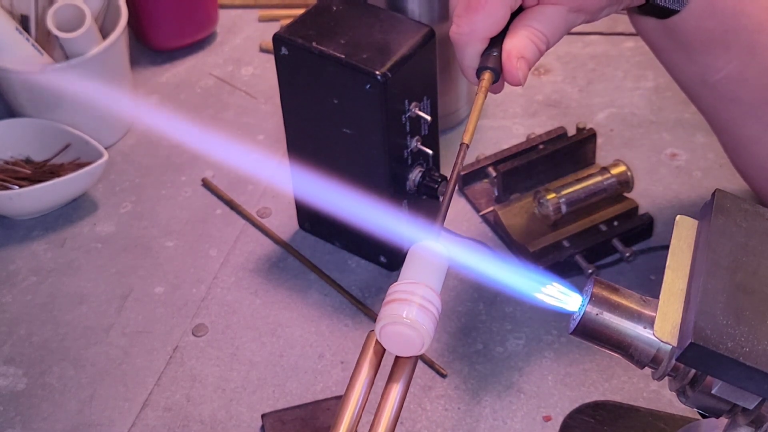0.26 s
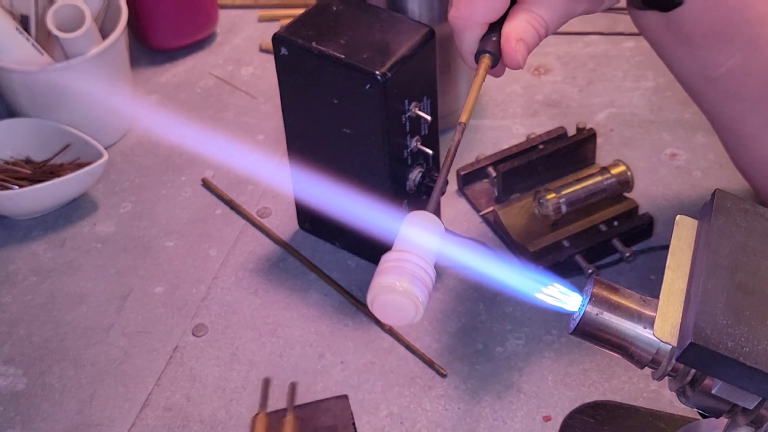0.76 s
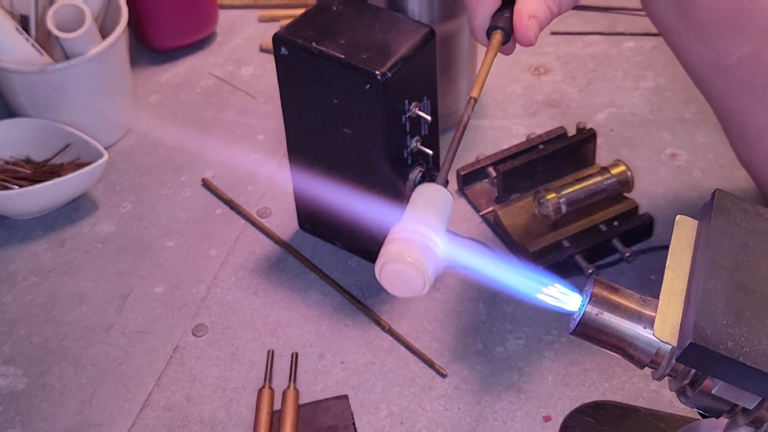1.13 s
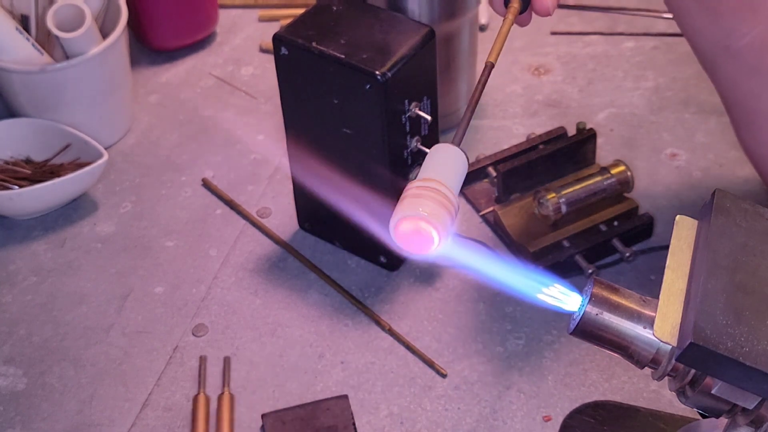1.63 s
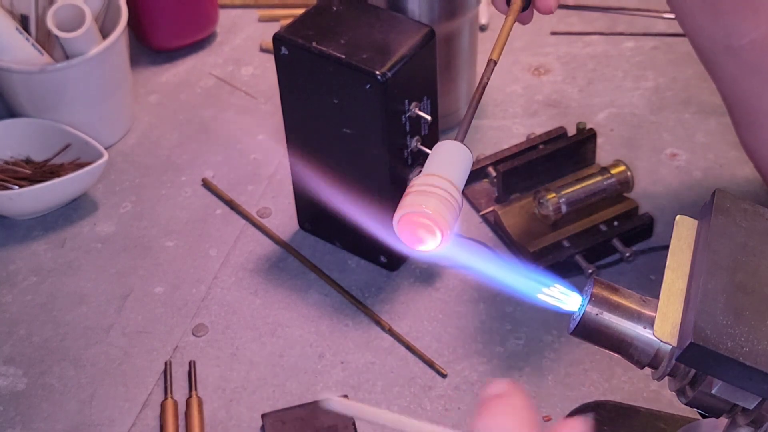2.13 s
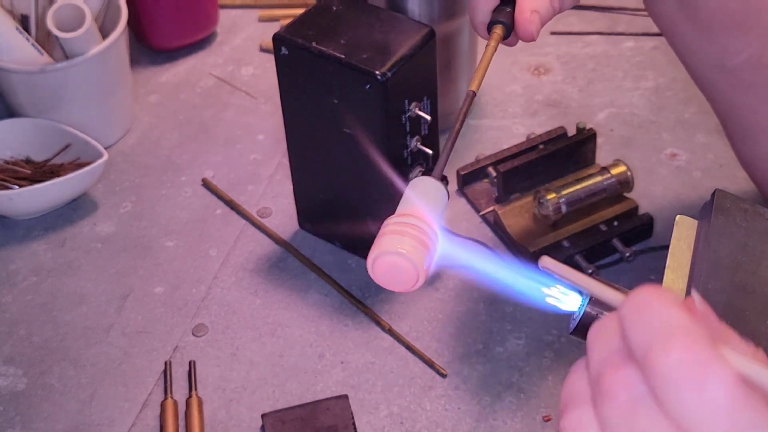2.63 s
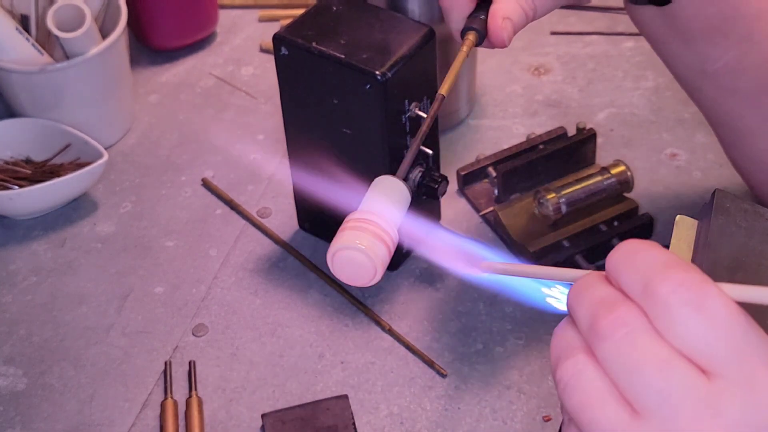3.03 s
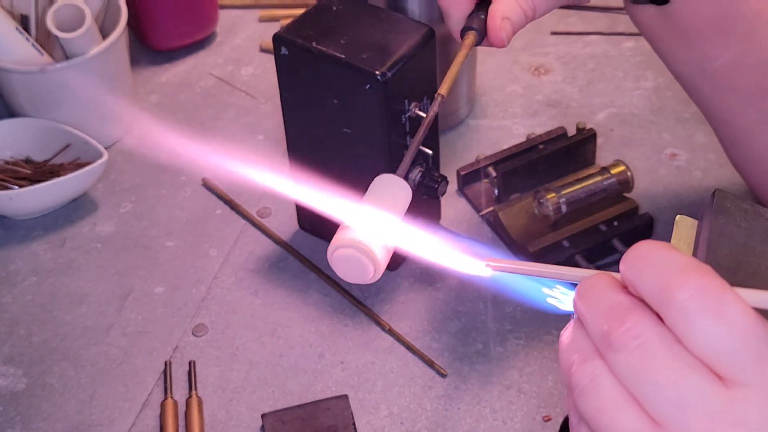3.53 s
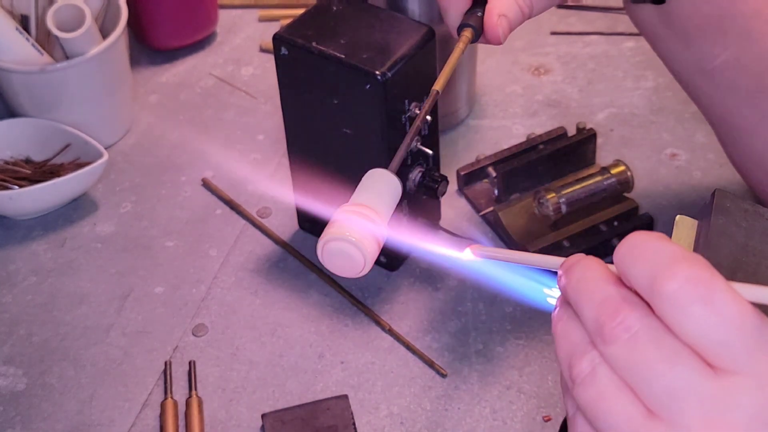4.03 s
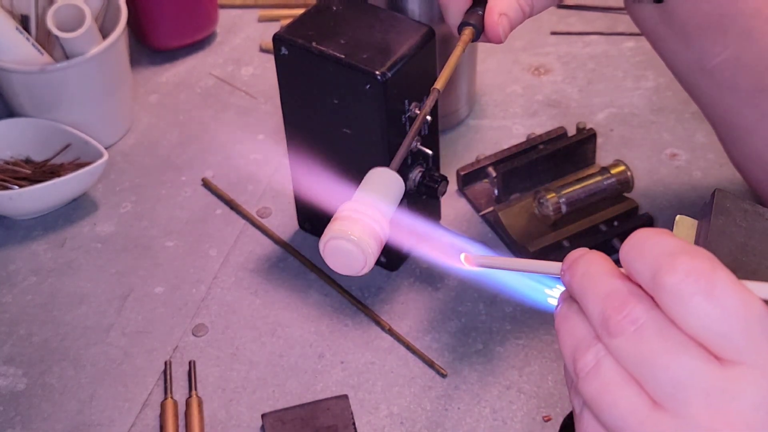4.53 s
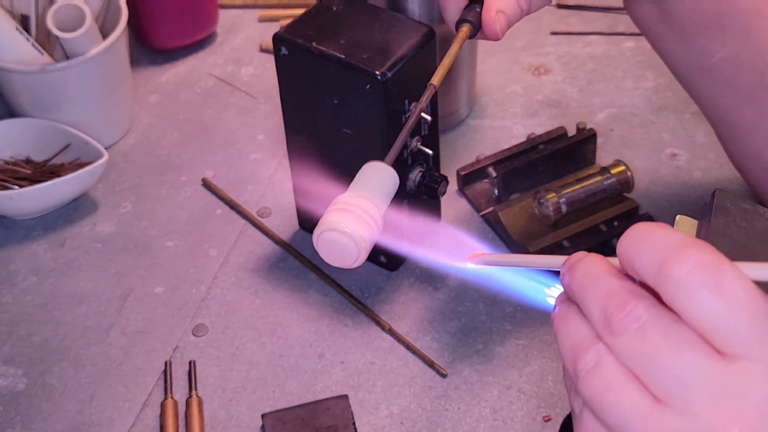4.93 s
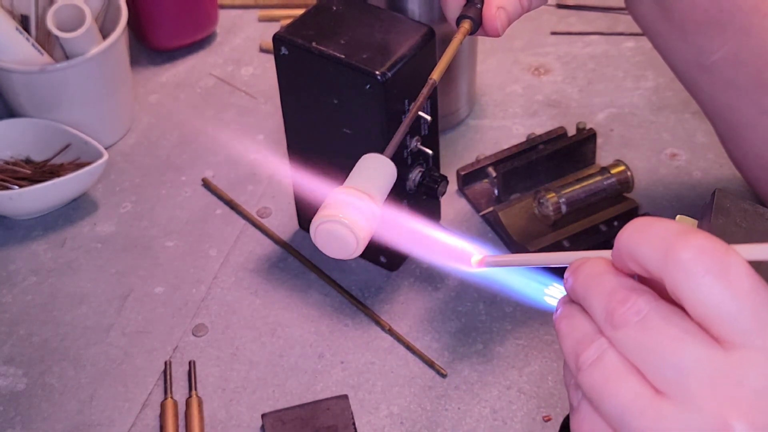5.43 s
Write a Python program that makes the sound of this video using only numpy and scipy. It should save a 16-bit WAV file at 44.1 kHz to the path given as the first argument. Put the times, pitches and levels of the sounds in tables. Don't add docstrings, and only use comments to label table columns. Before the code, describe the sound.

A low motor hum drones steadily under a soft breathy torch hiss while a metal tool scrapes and knocks on a bench early on.

```python
import sys
import numpy as np
from scipy import signal
from scipy.fft import rfft, irfft, next_fast_len
from scipy.io import wavfile
from scipy.ndimage import uniform_filter1d

SR = 44100
rng = np.random.default_rng(int(sys.argv[2]) if len(sys.argv) > 2 else 0)


def log_audio(samples):
    frames = np.atleast_2d(samples).T
    limited = np.clip(frames, -1, 1)
    pcm = np.round(limited * 32767).astype(np.int16)
    wavfile.write(sys.argv[1], SR, pcm)


def level_to_linear(level):
    exponent = np.asarray(level, float) / 20
    return 10 ** exponent


N = 250782

# time in seconds, turns per second, load released from 0 to 1.
MOTOR_SPEED = [
    (0, 28.888, 0),
    (4.7, 28.647, 0),
    (4.715, 28.715, 1),
    (4.78, 29.007, 1),
    (5.7, 29.007, 1),
]
CRANK_START_RAD, CASING_LAG_RAD = 3.965, 2.0
RELEASED_LAG_RAD = .6
CASING_GROWTH_DB_PER_S = 0.56
# multiple of the speed, loaded level in dB, released level in dB, left-right in dB.
MOTOR_TONES = [(1, -65, -62, 8), (2, -36, -36, 3.5), (3, -57, -51.5, -3), (4, -45, -44.5, 9.5),
               (5, -55.5, -60, 1), (6, -56, -54.5, -1), (7, -54.5, -52, 1), (8, -128, -73, 5),
               (9, -73.5, -69, 10), (10, -55.5, -61.5, -1.5), (11, -51, -55, 1.5), (12, -59, -62, -2.5),
               (13, -71, -69, 2), (14, -80, -73, 10), (17, -75, -83, 10)]

# time in seconds, level in dB, pitch in Hz, time to fall 60 dB in seconds.
VALVE_PINGS = [
    (4.712, -56, 2150, .04),
    (4.742, -46, 2180, .05),
    (4.775, -50, 1400, .05),
    (4.676, -53, 385, .25),
    (4.703, -52, 395, .1),
    (4.74, -51, 410, .16),
    (4.725, -53, 740, .06),
    (4.73, -56, 5300, .02),
]
# pitch in Hz, level in dB per Hz.
PUFF_COLOUR = [(300, -11), (520, -2), (740, -6), (1030, -13), (2120, -15), (4000, -17), (5400, -10),
               (6800, -15), (8500, -11), (11000, -19), (17500, -21)]
# pitch in Hz, width in Hz, level in dB.
PUFF_PEAKS = [(2220, 88, -10), (5150, 620, -10), (8070, 250, -17), (9600, 200, -20)]
PUFF_S, PUFF_DB, PUFF_RISE_DB_PER_S, PUFF_FALL_DB_PER_S = 4.733, -47, 181, 262

# time in seconds, bead in the core from 0 to 1, rod in the jet from 0 to 1.
WORK_IN_JET = [(0, 0.46, 0.2), (.45, 0, 0.5), (.9, 0.6, 0.23), (1.3, 0.27, 0.6), (1.9, 0.97, 0.25),
               (2.4, 1, 0.12), (2.9, 0.66, 0.42), (3.2, 0.7, 0.58), (3.7, 0.26, 0.78), (4.4, 0.47, 0.74),
               (4.85, 0.22, 1), (5.1, 0.33, 0.67), (5.4, 0, 0.7), (5.69, 0.3, 0.9)]
# pitch in Hz, level in dB per Hz.
HISS_COLOUR = [(330, -21), (560, -8), (750, -2.5), (1170, 1), (1600, -4.5), (2300, -4), (2900, -1),
               (3850, -6), (6500, -7.5), (9160, -9), (11100, -18), (13000, -13), (15200, -15), (17500, -8)]
# pitch in Hz, width in Hz, level in dB under the hiss.
FLAME_PEAKS = [(498.2, 26, -12), (931, 70, -22), (1195, 250, -18.5), (1407, 80, -17), (1907, 240, -18.5),
               (4835, 140, -17.5), (6010, 98, -18), (6510, 290, -17.5), (7750, 310, -23.5),
               (10320, 250, -25), (12800, 550, -18)]
# pitch in Hz, width in Hz, level in dB.
NOZZLE_WHISTLES = [
    (2658, 170, -2.5),
    (2907, 520, -5),
    (2876, 36, -15.5),
    (3315, 240, -11.5),
    (9024, 630, -1.5),
    (12970, 400, -3),
]
HISS_DB, HISS_ROD_DB = -58.5, 0.32
LOW_DB, LOW_BEAD_DB = -59.5, -9
MAIN_DB, MAIN_ROD_DB = -66, 13.5
HIGH_DB, HIGH_BOTH_DB = -71, 30
OVERTONE_HZ, OVERTONE_WIDTH_HZ, OVERTONE_DB, OVERTONE_BEAD_DB = 5880, 120, -87.5, 16
PEAK_WANDER_DB, FLUTTER_DB = 1.0, 1.2
# pitch in Hz, width in Hz, share lost from 0 to 1.
REFLECTION_DIPS = [(2240, 97, 0.23), (2765, 58, 0.25), (3860, 290, 0.18), (5410, 160, 0.23),
                   (7730, 270, 0.13)]
# time in seconds, level in dB, pitch in Hz.
SINGING_WHISTLE = [(0, -10, 3000), (1.0, 1, 3000), (1.75, 0, 3020), (2.0, 9.5, 3050), (2.4, 10, 3050),
                   (2.7, -4, 3030), (3.2, 2, 3030), (3.8, 1, 3010), (4.4, 1, 3060), (4.9, -5, 3040),
                   (5.3, 4, 3070), (5.58, 9.5, 3070), (5.69, -2, 3080)]
SINGING_DB, SINGING_WIDTH_HZ = -8.5, 68
# start in seconds, rise in seconds, pitch in Hz, width in Hz, dB.
SIDE_WHISTLES = [
    (5.47, .12, 2500, 150, -63),
    (5.585, .02, 3330, 100, -65),
    (5.645, .02, 3330, 60, -57),
    (5.25, .15, 3180, 110, -66),
]

# time in seconds, peak in dB, treble in dB, tail's time to fall 60 dB in seconds,
# bench brightness in dB per octave.
TOOL_KNOCKS = [(1.026, -39.5, 9.5, .06, 14), (1.056, -48, 9, .04, 0), (1.071, -47, 7, .04, 0),
               (1.094, -37.5, -21, 0.077, 7), (1.286, -51, 11, .05, 0), (1.31, -50, 6, .04, 0),
               (1.33, -45, 4, .04, 0), (1.351, -43, 3.5, .05, 7), (1.4714, -27, -17, .05, -1),
               (1.5464, -28.5, -24, .06, -5), (1.6643, -19.5, -22, .045, 0), (1.4771, -39, -31, .045, 9),
               (1.479, -33, -26, 0.041, 4), (1.5486, -36, -27, .05, -5.5), (1.554, -32.5, -24, .05, 8),
               (1.559, -37, -24, .05, 9), (1.668, -27, -24, .04, 11), (1.673, -38, -20, 0.055, 2),
               (1.6745, -24, -30, 0.097, 2.5)]
# pitch in Hz, level in dB, time to fall 60 dB in seconds.
BENCH_RINGS = [(890, 1.5, 0.017), (1153, 11, 0.017), (1880, 0, 0.015), (1160, -32, 0.23), (1144, -15, 0.22),
               (2580, -10, 0.046), (1420, -11, 0.06), (1536, -6.5, 0.06), (1690, -12.5, 0.13),
               (1815, -13.5, 0.087), (2220, -19, 0.041), (2857, -5.5, 0.024), (201, -9, 0.173),
               (306, -6, 0.04), (497, -16, 0.14)]
# pitch in Hz, level in dB, time to fall 60 dB in seconds.
BRASS_RINGS = [(4520, 11, .006), (5040, 5, 0.013), (5740, 8, .01), (6260, 8, 0.025), (7000, 7, 0.012),
               (9000, -6, .006), (12000, -12, .005)]
# start in seconds, length in seconds, level in dB, treble in dB, bench drone in dB.
TOOL_DRAGS = [
    (1.024, 0.089, -54, -0.5, -10),
    (1.277, 0.06, -73, 11, -6),
    (1.43, 0.038, -54.5, -3, 7),
    (1.465, 0.035, -47, 1, -8),
    (1.499, 0.048, -48, 2.5, 5),
    (1.549, 0.047, -47.5, 0.5, 4),
    (1.606, 0.05, -53, 1.5, -5),
    (1.657, 0.054, -45, 6, -1),
    (4.348, 0.044, -73, 10, -10),
    (1.713, 0.034, -46, 0, -9),
]
DRAG_ATTACK_S, DRAG_T60_S = 0.0076, 0.07
DRAG_SAG_DB_PER_S, TREBLE_SAG_DB_PER_S = 20, 32
# pitch in Hz, level in dB per Hz.
SLIDE_COLOUR = [(350, -37), (600, -7.5), (905, -5), (1140, -2), (1400, -15), (1920, -5), (2300, -1.5),
                (3270, -15.5), (4490, -18.5), (9920, -23.5), (14400, -20), (17500, -15)]
DRONE_HZ, DRONE_WIDTH_HZ, DRONE_DB = 1163, 65, -8
# time in seconds, peak in dB, brightness in dB per octave.
LIGHT_TOUCHES = [(1.116, -50, 3), (1.467, -47, 2), (1.4857, -38, 0), (1.493, -44, 3), (1.504, -43, 2),
                 (1.508, -40, -5), (1.517, -46, 4), (1.52, -42, 0), (1.5268, -44, 5), (1.53, -42, 2),
                 (1.5375, -41, 0), (1.5643, -38, 2), (1.5707, -38, -6), (1.5757, -38, 3), (1.581, -42, 1),
                 (1.5872, -43, -6), (1.684, -41, 4), (1.688, -35, 0), (1.6895, -35, -3), (1.698, -35, 3),
                 (1.705, -38, 2), (1.711, -34, 3), (1.7285, -43, 4), (1.7307, -41, 4), (1.736, -42, -2),
                 (1.7378, -46, 3), (1.742, -45, 6), (1.762, -44, 1)]
# pitch in Hz, level in dB, time to fall 60 dB in seconds.
TOUCH_RINGS = [(1080, -7.5, 0.041), (1157, -5.5, 0.033), (1380, -14, .02), (1580, -13, .02),
               (1980, -8, 0.023), (2240, -10, .025), (2750, -16, .015), (3250, -12.5, 0.011),
               (5000, -20, .006), (7500, -20, .004)]
# time in seconds, level in dB.
TIP_PINGS = [
    (1.4714, -66),
    (1.5464, -57),
    (1.6643, -49),
]
TIP_HZ, TIP_T60_S, TIP_LEAN_DB = 14435, .2, 8

# pitch in Hz, level in dB, left-right in dB, wander in dB.
STEADY_TONES = [
    (50.3, -57, 0, 2),
    (59.4, -64, 2, 1.5),
    (120.03, -59, 4, .6),
    (240.05, -71, 5, .6),
    (263, -73, 3, 2),
    (528.6, -74, 8, 1.5),
]
# pitch in Hz, level in dB per Hz.
RUMBLE_COLOUR = [(18, -37), (30, -4), (40, -10), (55, 1.5), (90, -3.5), (130, -13.5), (190, -6.5),
                 (230, -17), (330, -10), (420, -22), (500, -5), (560, -26), (620, -17), (700, -40)]
RUMBLE_DB = -50
ROOM_T60_S, ROOM_DB, ROOM_ALIKE = .25, -3, .5

# pitch in Hz, likeness where 1 is the same.
SIDE_LIKENESS = [(60, 1), (130, 0.54), (290, 0.93), (500, 0.22), (700, 0.08), (900, 0.87), (1150, 0.066),
                 (1500, 0.49), (3100, 0.14), (6820, 0.074), (15000, 0.05)]
# pitch in Hz, left-right in dB.
SIDE_LEANING = [(60, 7.5), (110, -2), (200, 4.5), (380, 4), (700, 0.5), (1290, 3), (2380, -1.5), (4400, 2),
                (8120, 4.5), (15000, 2.5)]
# pitch in Hz, lag in radians.
RIGHT_LAG = [(400, 0), (560, 1.2), (700, 0), (900, 1.7), (1150, 0), (1400, -2), (2300, 0), (3400, 0),
             (4700, -1), (7000, -2), (9000, 2)]
SIDES = np.array([[.5], [-.5]])
TOP_HZ = 15490


def rms_one(x):
    return x / np.sqrt(np.mean(x ** 2) + 1e-20)


def evened(x):
    return x / np.sqrt(uniform_filter1d(np.mean(x ** 2, axis=0), size=SR // 40))


def in_time(rows):
    s, *columns = np.transpose(rows)
    return [np.interp(np.arange(N) / SR, s, column) for column in columns]


def at_hz(points, hz):
    points = np.array(points)
    return np.interp(np.log(hz), np.log(points[:, 0]), points[:, 1])


def filtered(x, kind, hz):
    return signal.sosfilt(signal.butter(4, hz, kind, fs=SR, output="sos"), x)


def clicks_at(seconds, heights):
    clicks = np.zeros(N)
    clicks[np.round(np.asarray(seconds) * SR).astype(int)] = heights
    return clicks


def drift(rate):
    r = np.exp(-80 * np.pi * rate / SR)
    slow = signal.lfilter([1], [1, -2 * r, r * r], rng.standard_normal(N // 40 + 2002))[2000:]
    return np.interp(np.arange(N) / 40, np.arange(len(slow)), rms_one(slow - slow.mean()))


def ring(clicks, hz, t60):
    r = level_to_linear(-60 / (t60 * SR))
    w = 2 * np.pi * hz / SR
    return signal.lfilter([0, np.sin(w)], [1, -2 * r * np.cos(w), r * r], clicks + 1e-18)


def stereo(pair, hz, alike):
    alike = np.clip(alike, -.99, .99)
    mixed = np.sqrt(1 + alike) * pair[0] + np.sqrt(1 - alike) * pair[1] * 2 * SIDES
    left, right = level_to_linear(at_hz(SIDE_LEANING, hz) * SIDES) * mixed
    lag = round(at_hz(RIGHT_LAG, hz) * SR / (2 * np.pi * hz))
    return np.array([left, np.roll(right, lag)])


def banded_noise(spectrum, patchy_db, extra_alike, count):
    out, together = 0, drift(2.3)
    edges = np.geomspace(spectrum[0][0], spectrum[-1][0], count + 1)
    white = rng.standard_normal((2, 2, N))
    for k, (low, high) in enumerate(zip(edges, edges[1:])):
        band = signal.butter(2, [low, high], "band", fs=SR, output="sos")
        pair = signal.sosfilt(band, white[k % 2])
        hz = np.sqrt(low * high)
        flicker = .15 * together + .6 * drift(5) + .9 * drift(28)
        gain = level_to_linear(at_hz(spectrum, hz) + patchy_db * flicker)
        out = out + gain * stereo(pair, hz, at_hz(SIDE_LIKENESS, hz) + extra_alike)
    return out / np.std(out.mean(axis=0))


def whistle(hz, width_hz, alike):
    r = np.exp(-np.pi * width_hz / SR)
    section = [1, 0, -1, 1, -2 * r * np.cos(2 * np.pi * hz / SR), r * r]
    noise = signal.sosfilt([section, section], rng.standard_normal((2, N)))
    return stereo(rms_one(noise), hz, alike)


def motor():
    speed, released = in_time(MOTOR_SPEED)
    crank, out = CRANK_START_RAD + 2 * np.pi * np.cumsum(speed) / SR, 0
    lag_share = {2: 0, 3: 1.4, 6: .25, 7: .6, 8: .3, 14: .55}
    from_middle = np.arange(N) / SR - MOTOR_SPEED[1][0] / 2
    for order, loaded_db, released_db, lean_db in MOTOR_TONES:
        lag = CASING_LAG_RAD * lag_share.get(order, 1)
        if order == 11:
            lag = lag + np.pi
        if order in (6, 10, 12):
            lag = lag + RELEASED_LAG_RAD * released
        level_db = loaded_db + (released_db - loaded_db) * released + .3 * drift(1.5)
        if order in (10, 11):
            level_db += CASING_GROWTH_DB_PER_S * from_middle * (1 - released)
        wave = np.cos(order * crank + lag - 0.19 * SIDES)
        out = out + np.sqrt(2) * level_to_linear(level_db + lean_db * SIDES) * wave
    return out


def valve():
    late = np.arange(N) / SR - PUFF_S
    air = evened(banded_noise(PUFF_COLOUR, patchy_db=-0.5, extra_alike=0.11, count=8))
    air = air + sum(level_to_linear(db) * whistle(hz, width, alike=0.27) for hz, width, db in PUFF_PEAKS)
    out = level_to_linear(PUFF_DB + np.minimum(PUFF_RISE_DB_PER_S * late, -PUFF_FALL_DB_PER_S * late)) * air
    for s, db, hz, t60 in VALVE_PINGS:
        out = out + ring(clicks_at(s, level_to_linear(db)), hz, t60)
    return out


def flame():
    bead, rod = in_time(WORK_IN_JET)
    low_db = LOW_DB + LOW_BEAD_DB * bead
    main_db = MAIN_DB + MAIN_ROD_DB * rod
    high_db = HIGH_DB + HIGH_BOTH_DB * bead * rod
    hiss = banded_noise(HISS_COLOUR, patchy_db=2.44, extra_alike=0.0064, count=18)
    for hz, width, db in FLAME_PEAKS:
        wander_db = PEAK_WANDER_DB * np.clip(drift(0.89), -1.5, 1.5)
        hiss = hiss + level_to_linear(db + wander_db) * whistle(hz, width, alike=0.35)
    nozzle = 0
    drives_db = [low_db, main_db, main_db, main_db, high_db, high_db]
    for (hz, width, db), drive_db in zip(NOZZLE_WHISTLES, drives_db):
        flutter_db = FLUTTER_DB * np.clip(drift(4.7), -2, 2)
        nozzle = nozzle + level_to_linear(drive_db + db + flutter_db) * rms_one(whistle(hz, width, alike=0.6))
    overtone = whistle(OVERTONE_HZ, OVERTONE_WIDTH_HZ, alike=0.39)
    overtone = level_to_linear(OVERTONE_DB + OVERTONE_BEAD_DB * bead) * overtone
    hiss = level_to_linear(HISS_DB + HISS_ROD_DB * rod + 2.5) * dipped(hiss)
    return hiss + dipped(nozzle) + level_to_linear(main_db) * singing() + side_whistles() + overtone


def dipped(x):
    for hz, width_hz, share in REFLECTION_DIPS:
        x = x - share * signal.lfilter(*signal.iirpeak(hz, hz / width_hz, fs=SR), x)
    return x


def singing():
    db, hz = in_time(SINGING_WHISTLE)
    r = np.exp(-np.pi * SINGING_WIDTH_HZ / SR)
    slow = signal.sosfilt([[1, 0, 0, 1, -2 * r, r * r]], rng.standard_normal((2, 2, N)))
    turn = 2 * np.pi * np.cumsum(hz) / SR
    tone = slow[0] * np.cos(turn) + slow[1] * np.sin(turn)
    return level_to_linear(SINGING_DB + db) * evened(stereo(tone, hz.mean(), alike=0.44))


def side_whistles():
    t, out = np.arange(N) / SR, 0
    for s, rise, hz, width, db in SIDE_WHISTLES:
        out = out + level_to_linear(db) * np.clip((t - s) / rise, 0, 1) * whistle(hz, width, alike=0.41)
    return out


def contact_noise():
    noise = banded_noise(SLIDE_COLOUR, patchy_db=1.0, extra_alike=0.063, count=12)
    body = rms_one(filtered(noise, "low", 3500))
    treble = filtered(noise, "high", 3500)
    ringing = sum(level_to_linear(db) * rms_one(ring(noise, hz, t60)) for hz, db, t60 in BENCH_RINGS[3:12])
    body = body + level_to_linear(-1.5) * rms_one(ringing)
    low, upper = filtered(body, "low", 2300), filtered(body, "high", 2300)
    grain = level_to_linear(1.2 * np.clip(drift(140), -2, 2))
    drone = level_to_linear(DRONE_DB) * evened(whistle(DRONE_HZ, DRONE_WIDTH_HZ, alike=0.74))
    return grain * (evened(low) + level_to_linear(-5.5) * evened(upper)), grain * evened(treble), drone


def knocks(body, treble):
    s, peak_db, treble_db, tail_t60, bright_db = np.transpose(TOOL_KNOCKS)
    out, rings = np.zeros((2, N)), BENCH_RINGS + BRASS_RINGS
    luck_db = rng.normal(0, 1, (len(s), len(rings)))
    for k, (hz, db, t60) in enumerate(rings):
        if k < len(BENCH_RINGS):
            tilt_db = bright_db * np.log2(hz / DRONE_HZ) - 0.29 * treble_db
        else:
            tilt_db = treble_db
        heights = (-1) ** k * level_to_linear(peak_db + db - 19 + luck_db[:, k] + tilt_db)
        out += level_to_linear(at_hz(SIDE_LEANING, hz) * SIDES) * ring(clicks_at(s, heights), hz, t60)
    crack = clicks_at(s, level_to_linear(peak_db + 0.33 * treble_db - 20.5))
    out += signal.lfilter([1], [1, -np.exp(-1 / (0.015 * SR))], crack + 1e-18) * treble
    for start, db, high_db, t60 in zip(np.round(s * SR).astype(int), peak_db, treble_db, tail_t60):
        dying = level_to_linear(db - 60 * np.arange(SR // 2) / SR / t60)
        span = slice(start, start + len(dying))
        tail = level_to_linear(-.3 * high_db - 25) * body[:, span] + level_to_linear(.5 * high_db - 14.5) * treble[:, span]
        out[:, span] += dying * tail
    return out


def slide(body, treble, drone):
    out, t = 0, np.arange(N) / SR
    for start, length, db, treble_db, drone_db in TOOL_DRAGS:
        since = np.maximum(t - start, 0)
        dying_db = -DRAG_SAG_DB_PER_S * since - 60 * np.maximum(since - length, 0) / DRAG_T60_S
        scrape = level_to_linear(treble_db - TREBLE_SAG_DB_PER_S * since) * treble
        sound = body + level_to_linear(drone_db) * drone + scrape
        out = out + np.minimum(since / DRAG_ATTACK_S, 1) * level_to_linear(db + dying_db) * sound
    return out


def chatter():
    s, peak_db, bright_db = np.transpose(LIGHT_TOUCHES)
    luck_db, out = rng.normal(0, 2.4, (len(s), len(TOUCH_RINGS))), 0
    for k, (hz, db, t60) in enumerate(TOUCH_RINGS):
        tilt_db = bright_db * np.log2(hz / DRONE_HZ)
        heights = (-1) ** k * level_to_linear(peak_db + db + luck_db[:, k] + tilt_db)
        out = out + level_to_linear(at_hz(SIDE_LEANING, hz) * SIDES) * ring(clicks_at(s, heights), hz, t60)
    s, db = np.transpose(TIP_PINGS)
    return out + level_to_linear(TIP_LEAN_DB * SIDES) * ring(clicks_at(s, level_to_linear(db)), TIP_HZ, TIP_T60_S)


def steady_tones():
    t, out = np.arange(N) / SR, 0
    for hz, db, lean_db, wander_db in STEADY_TONES:
        level = level_to_linear(db + lean_db * SIDES + wander_db * drift(0.62))
        out = out + np.sqrt(2) * level * np.sin(2 * np.pi * (hz * t + rng.random()))
    return out


def rumble():
    return level_to_linear(RUMBLE_DB) * banded_noise(RUMBLE_COLOUR, patchy_db=1.7, extra_alike=0.02, count=20)


def room(x):
    t = np.arange(round(ROOM_T60_S * SR)) / SR
    dying = level_to_linear(-60 * t / ROOM_T60_S) * (t > .003)
    shared, left, right = rng.standard_normal((3, len(t))) * dying
    echoes = np.sqrt(ROOM_ALIKE) * shared + np.sqrt(1 - ROOM_ALIKE) * np.array([left, right])
    echoes = level_to_linear(ROOM_DB) * echoes / np.linalg.norm(echoes, axis=1, keepdims=True)
    echoes[:, 0] = 1
    size = next_fast_len(N)
    wet = irfft(rfft(x, n=size) * rfft(echoes, n=size), n=size)[:, :N]
    return wet / np.sqrt(1 + level_to_linear(2 * ROOM_DB))


def scene():
    body, treble, drone = contact_noise()
    tool = knocks(body, treble) + slide(body, treble, drone) + chatter()
    return motor() + valve() + room(flame()) + tool + steady_tones() + rumble()


def roll_off(x):
    return signal.sosfilt(signal.butter(12, 16040, fs=SR, output="sos"), x)


def record(dry):
    cut = signal.sosfilt(signal.ellip(12, .5, 60, TOP_HZ, fs=SR, output="sos"), dry)
    return roll_off(cut)


dry = scene()
out = record(dry)
log_audio(out)
```